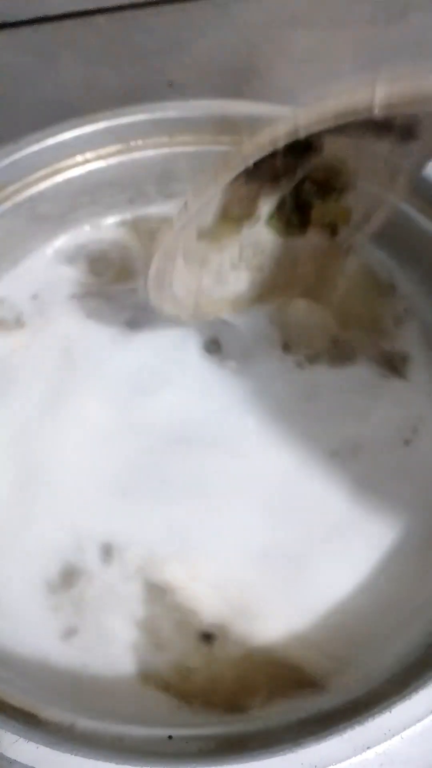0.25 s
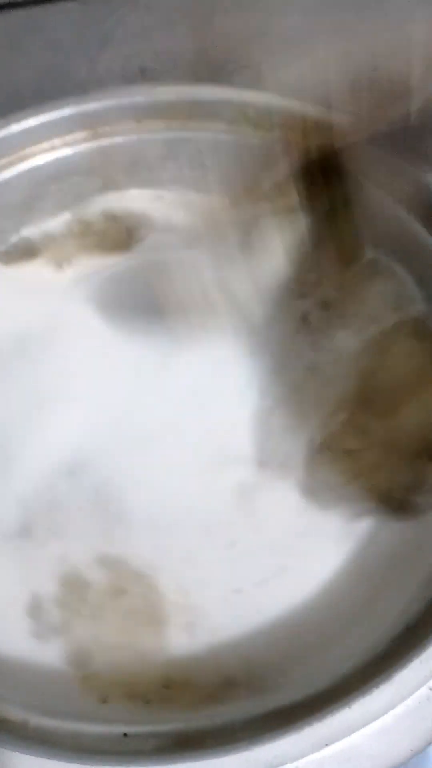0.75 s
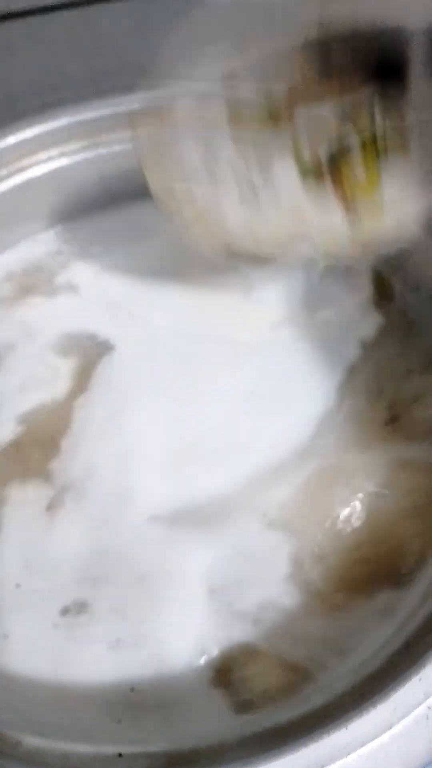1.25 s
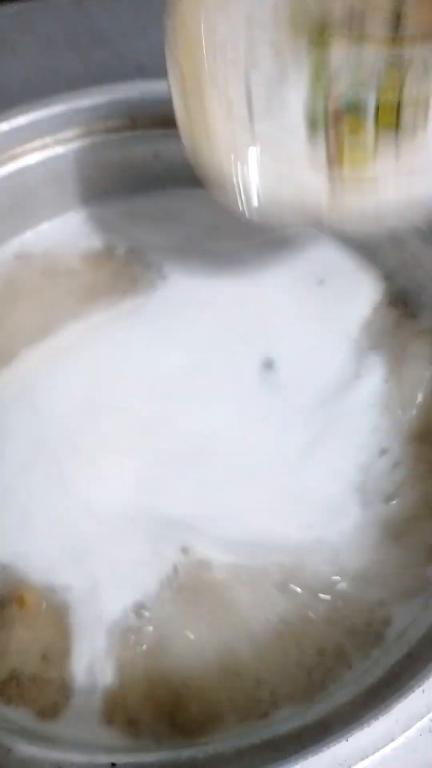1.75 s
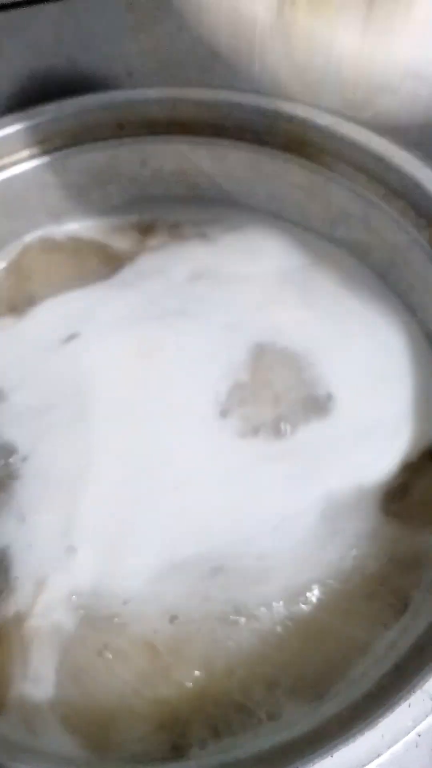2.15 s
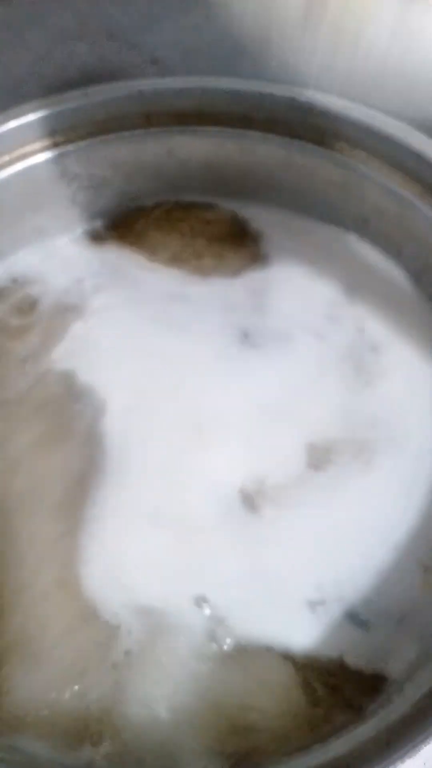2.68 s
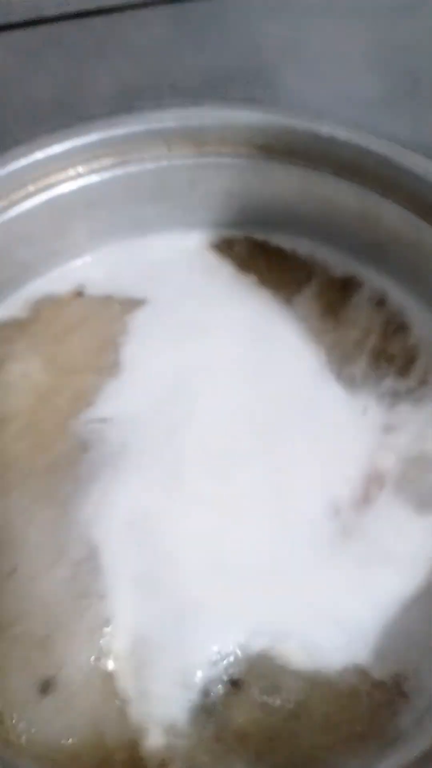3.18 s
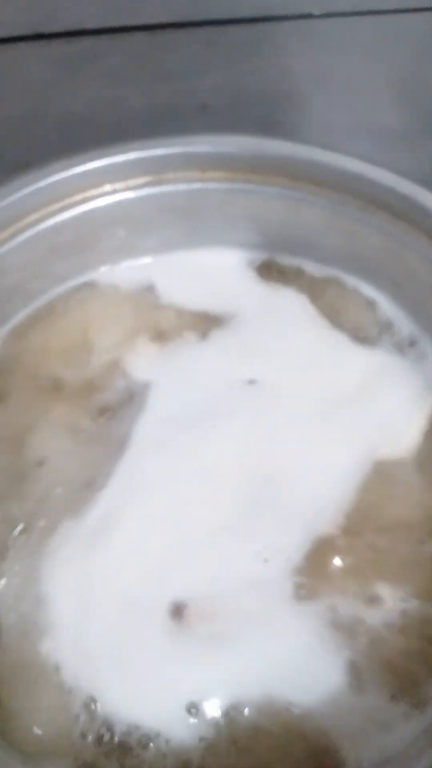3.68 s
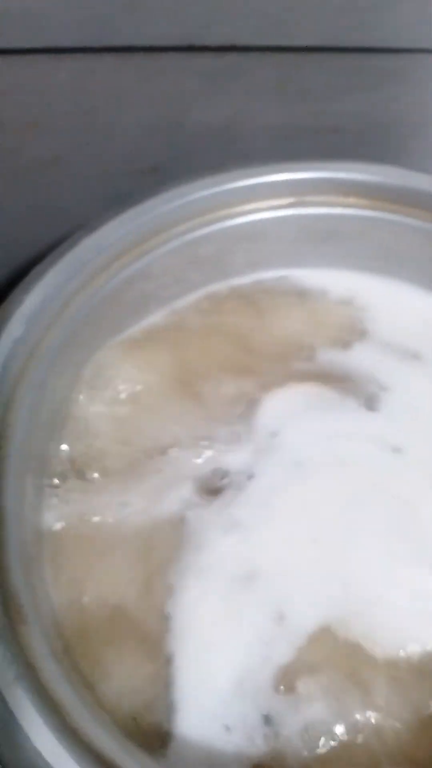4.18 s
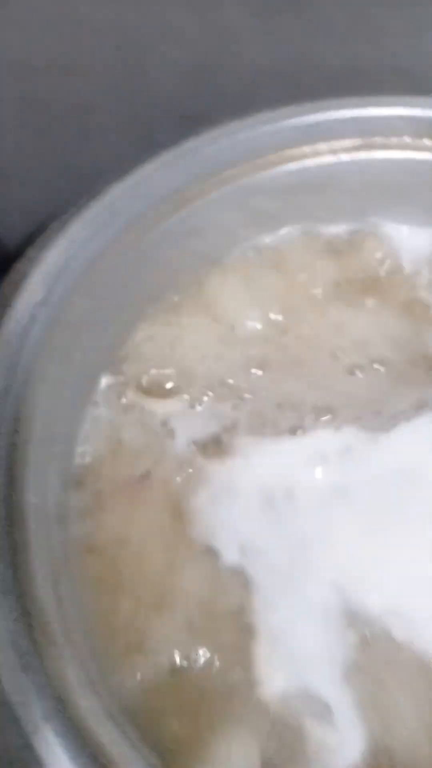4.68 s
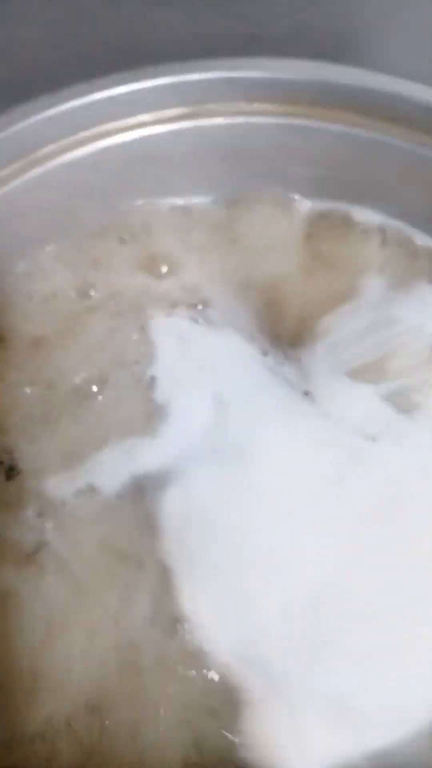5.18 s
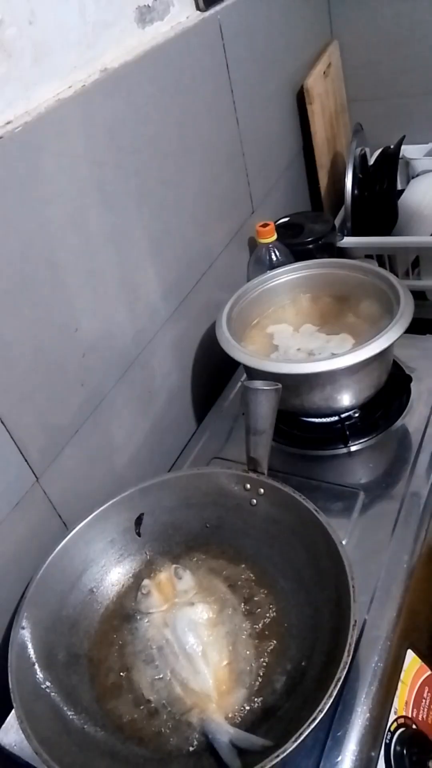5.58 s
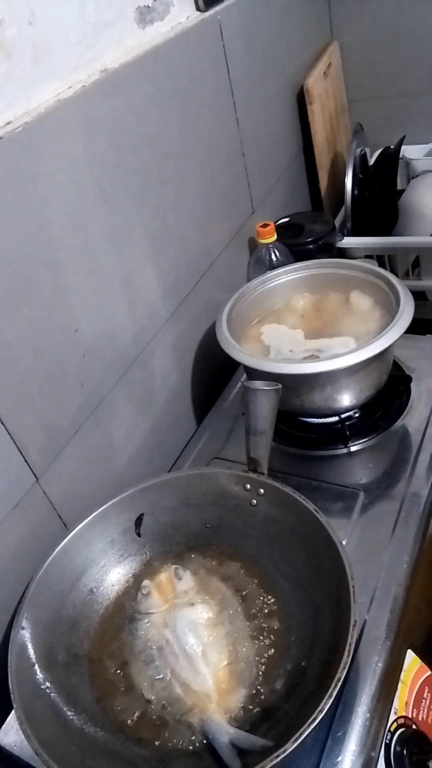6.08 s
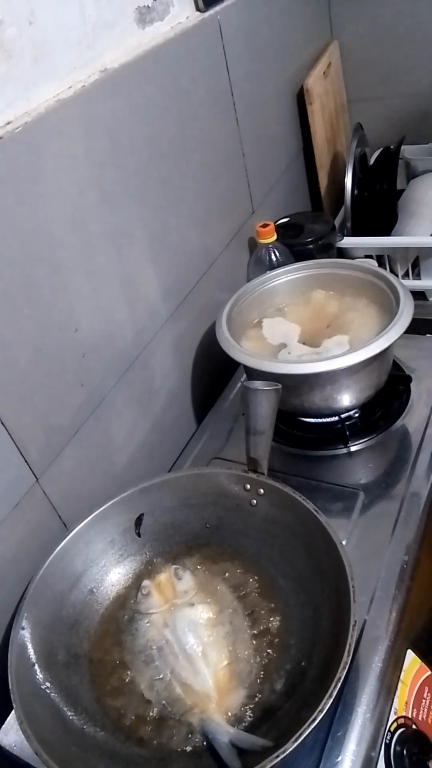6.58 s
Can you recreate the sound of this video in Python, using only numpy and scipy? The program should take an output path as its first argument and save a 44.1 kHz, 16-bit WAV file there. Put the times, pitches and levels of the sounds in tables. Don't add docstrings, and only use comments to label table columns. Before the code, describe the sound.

In a small tiled kitchen, close to a phone microphone, a gas flame rumbles low and hisses under faintly bubbling soup. Sparse sharp ticks of spitting fat and dull bowl bumps come and go. The bowl is set down with a ringing clink and softer bounce. A finger tap, a tiny dead silence, then dense sizzling of fish in oil with big wet pops.

```python
import sys
import numpy as np
from scipy import signal
from scipy.fft import rfft, irfft, next_fast_len
from scipy.io import wavfile
from scipy.ndimage import uniform_filter1d, map_coordinates

SR = 44100
rng = np.random.default_rng(int(sys.argv[2]) if len(sys.argv) > 2 else 0)


def unload_wav(signal):
    wavfile.write(
        sys.argv[1],
        SR,
        np.round(np.clip(np.atleast_2d(signal).T, -1, 1) * 32767).astype(np.int16),
    )


def makeup_ratio(level_db):
    decades = np.asarray(level_db, float) / 20
    return 10 ** decades


N = 301644

PAUSE = (5.4545, 5.5495)

# frequency in Hz, level in dB per Hz.
SIZZLE = [(180, -23), (330, -10.5), (630, -14.5), (1100, -11.5), (2000, -4), (3200, -0.5), (4300, -4.5),
          (5900, -14.5), (8200, -10.5), (9300, -25), (11000, -29), (13000, -38.5), (15800, -27.5)]
# time in seconds, strength in dB.
BOIL = [(5.7, -32), (5.874, -30.5), (5.982, -34.5), (6.008, -27.5), (6.032, -32.5), (6.508, -33.5),
        (6.562, -31), (6.84, -33)]


def frying():
    start, end = 5.5, 6.83
    wet = np.zeros(N)
    for _ in range(4):
        fizz = bubbles(2000, start, end, SIZZLE, cycles=3.5, scatter_db=2.8)
        wet += fizz + makeup_ratio(-2.5) * signal.fftconvolve(fizz, tail(stretch=0.35))[:N]
    crackle = bubbles(700, start, end, SIZZLE, cycles=1.6, scatter_db=2.8)
    bed = rush(lambda hz: makeup_ratio(along(SIZZLE, hz)), patchy_db=1.74) * makeup_ratio(2.0 * wobble(30))
    clumps = makeup_ratio(3.5 * wobble(90))
    boiling = makeup_ratio(-12.0) * wet * clumps + makeup_ratio(-15.5) * crackle + makeup_ratio(-3.0) * bed
    level_db = opening() + curve(BOIL)
    return (np.arange(N) / SR > PAUSE[0]) * makeup_ratio(level_db) * boiling


# start in seconds, strength in dB, pitch in Hz.
POPS = [(5.554, -34, 4200), (5.597, -22, 2720), (5.626, -38, 2750), (5.648, -21, 2630), (5.722, -20, 3200),
        (5.758, -17.5, 2530), (5.816, -19, 2880), (5.932, -18, 2650), (5.986, -24, 3520),
        (6.004, -12, 2700), (6.046, -15.5, 3370), (6.07, -20, 2370), (6.087, -15, 2800), (6.116, -25, 4000),
        (6.157, -29, 3340), (6.173, -18, 4040), (6.23, -13.5, 2910), (6.246, -22, 2220), (6.285, -17, 2820),
        (6.368, -21, 3070), (6.405, -18.5, 4250), (6.46, -21, 2570), (6.489, -23, 3580),
        (6.5527, -12, 1527), (6.594, -13.5, 4120), (6.612, -23, 3630), (6.659, -16, 2340),
        (6.701, -17, 2740), (6.744, -32, 2590), (6.803, -23, 2770)]


def big_bubbles():
    track = np.zeros(N)
    for s, db, hz in POPS:
        room_db = -2.5 - 0.46 * (db + 16)
        add_burst(track, s, db - 5, hz, cycles=4.8, snap_db=-24, room_db=room_db,
                  thud_db=-28, snap_t60=.012, stretch=.45)
    return track


# start in seconds, strength in dB, pitch in Hz, snap in dB, room in dB.
SPITS = [(0.188, -41, 2370, -10, -3), (0.2942, -33, 2230, -3, -12), (0.8106, -25.5, 5130, -3.5, -7.5),
         (0.911, -26.5, 3670, -6, -5), (1.3375, -43, 2330, -20, 0), (1.4119, -26.5, 5010, -10, -2),
         (1.436, -40, 2480, -20, -3), (1.5487, -19, 7800, -10.5, -11.5), (1.941, -45, 8200, -15, -1.5),
         (2.3605, -38, 4760, -14, -12), (2.392, -17.5, 2840, -12, -7), (2.555, -32.5, 7400, -12, -14),
         (2.613, -19, 4780, -9.5, -9), (2.827, -31, 5320, -4, -2.5), (3.1387, -16, 4730, -16, -6),
         (3.32, -39, 2420, -11, -4), (3.571, -36, 3270, -8, -6.5), (3.6095, -41.5, 8500, 1, -8),
         (3.8346, -27, 6240, -5, -8), (3.889, -38, 8300, -10, -2.5), (3.919, -18.5, 4000, -10.5, -6.5),
         (4.4241, -25.5, 2670, -7, -7), (4.44, -31, 6940, -2, -9)]


def spitting_fat():
    life_s = .0007
    track = np.zeros(N)
    for s, db, hz, snap_db, room_db in SPITS:
        add_burst(track, s, db - 5, hz, life_s * hz, snap_db - 2, room_db + 11,
                  thud_db=-40, snap_t60=.006, stretch=.9)
    return track


# frequency in Hz, level in dB, t60 in seconds.
BOWL = [(585, -19, 0.42), (1082, -20, 0.35), (1755, -18, 0.66), (2552, -2.5, 0.32), (2729, -13, 0.25),
        (2853, -25, 0.36), (3095, -14, 0.4), (3250, -14, 0.21), (3445, -3, 0.24), (3919, -21, 0.22),
        (4452, -13, 0.26), (5173, -25, 0.27), (5373, -17, 0.17), (6471, -23, 0.21), (6740, -26, 0.22),
        (6934, -30, 0.23), (7036, -29, 0.22), (7709, -29, 0.22), (7930, -35, 0.28), (8166, -23, 0.18)]
# start in seconds, level in dB, favoured pitch in Hz, spread in octaves,
# share of the ring time the hand leaves.
CLINKS = [
    (4.6078, -4, 3300, 1.8, .4),
    (4.6612, -0.5, 2550, .28, 0.29),
]
# frequency in Hz, level in dB per Hz.
CRASH = [(30, -37.5), (60, -3.5), (150, -4.5), (400, -8.5), (900, -5.5), (1800, -7), (3100, 4.5),
         (4000, -7), (8000, -12.5), (11000, -36.5), (16000, -32)]
# start in seconds, level in dB, t60 in seconds.
RIM = [
    (2.4235, -39.5, 0.23),
    (3.1, -53, .05),
    (.5515, -62, .05),
]


def bowl():
    track, t = np.zeros(N), np.arange(SR // 2) / SR
    for s, db, t60 in RIM:
        add(track, s, makeup_ratio(db) * puff(CRASH, t60))
    hz, level, t60 = np.transpose(BOWL)[:, :, None]
    for s, db, favoured_hz, spread, damping in CLINKS:
        chance = rng.random((len(BOWL), 3))
        held = makeup_ratio(-9 * abs(np.log2(hz / favoured_hz)) / spread - 60 * t / (damping * t60))
        beating = np.cos(2 * np.pi * ((9 + 14 * chance[:, 1:2]) * t + chance[:, 2:]))
        free_db = -20 - 0.2 * np.maximum(level, -22)
        free = makeup_ratio(free_db - 60 * t / np.clip(t60, .24, .3)) * beating
        tones = np.sin(2 * np.pi * (hz * t + chance[:, :1]))
        rise_s = .005 / np.sqrt(spread)
        ring = (makeup_ratio(level) * (held + free) * tones).sum(axis=0) * (1 - np.exp(-t / rise_s)) ** 2.2
        echo = signal.fftconvolve(ring, tail(stretch=.9))[:len(t)]
        add(track, s, makeup_ratio(db) * (ring + makeup_ratio(-17) * echo))
    add(track, CLINKS[0][0], makeup_ratio(-16.5) * puff(CRASH, t60=0.1) + makeup_ratio(-20.5) * puff(CRASH, t60=.26))
    add(track, CLINKS[1][0], makeup_ratio(-29.5) * puff(CRASH, t60=0.14))
    return track


# start in seconds, peak in dB, pitch in Hz, cycles, thud in
# dB.
KNOCKS = [(.530, -37.5, 2280, 1.9, -10), (2.424, -23.5, 1840, 3.8, -6), (3.488, -46.5, 304, 4.2, 6),
          (4.244, -48, 12000, 1.5, -28.5), (2.4245, -30.5, 8050, 1.8, -30),
          (4.366, -29.5, 1990, 0.88, -9.5), (5.845, -35, 820, 3, -15), (5.882, -38, 920, 3, -14),
          (5.999, -43, 315, 4, 3), (6.31, -32.5, 403, 0.85, -1.5), (6.625, -31, 880, 2.6, 0),
          (6.683, -31, 1540, 4.3, -5), (6.696, -38.5, 298, 2.4, 2)]


def knocks():
    track = np.zeros(N)
    for s, db, hz, cycles, thud_db in KNOCKS:
        snap_db = -20.5 + 1.5 * np.log2(hz / 1000)
        add_burst(track, s, db, hz, cycles, snap_db, room_db=3, thud_db=thud_db, snap_t60=.04, stretch=.75)
    return track


# start in seconds, peak in dB, pitch in Hz, cycles, thud in dB.
TAPS = [
    (.552, -29.5, 190, 0.82, -11),
    (2.4222, -37.5, 128, 2.3, -22),
    (.5505, -29, 800, 1.8, -3.5),
    (0.5539, -22.5, 513, 0.79, -7.5),
    (5.4424, -26, 1430, 0.8, -18),
    (5.4436, -38, 107, 1.4, -24),
    (5.4482, -21.5, 1460, 1.55, -2),
]


def taps():
    track = np.zeros(N)
    for s, db, hz, cycles, thud_db in TAPS:
        add_burst(track, s, db, hz, cycles, snap_db=-25.5, room_db=-5, thud_db=thud_db, snap_t60=.012, stretch=.6)
    return track


# time in seconds, level in dB.
FLAME = [(0.0, -51.5), (0.47, -53.5), (0.59, -53.5), (1.6, -55.5), (2.01, -53.5), (2.22, -56), (2.93, -53),
         (4.04, -54.5), (4.2, -54), (5.19, -53.5), (5.31, -55), (5.43, -56)]
# frequency in Hz, level in dB per Hz.
HISS = [(180, -3.5), (300, -8.5), (600, -7.5), (800, -9), (1750, -9), (2600, -12.5), (5000, -24),
        (6800, -24), (8100, -20), (9200, -30.5), (11300, -38), (13300, -41.5), (15800, -33.5)]


def stove():
    later = np.arange(N) / SR > PAUSE[0]
    wok_db = -53.5 + 2.3 * opening()
    pot_db = -0.5 + curve(FLAME)
    rumble_db = np.where(later, wok_db, pot_db) - 0.7 * wobble(4.5)
    rumble = makeup_ratio(rumble_db + 3.5 + 0.35 * wobble(6.6)) * rush(hollow, patchy_db=1.3)
    hiss = makeup_ratio(-53 + 0.14 * wobble(4.9)) * rush(lambda hz: makeup_ratio(along(HISS, hz)), patchy_db=1.03)
    soup = bubbles(900, start=0, end=3.9, spectrum=HISS, cycles=3.6, scatter_db=-0.5)
    soup_echo = signal.fftconvolve(soup, tail(stretch=.8))[:N]
    return rumble + hiss + makeup_ratio(-72) * (soup + 2 * soup_echo)


# frequency in Hz, level in dB per Hz.
RUMBLE = [(12, -47.5), (25, -8), (40, -15), (50, -14.5), (65, -4), (108, -13), (150, -12), (200, -20.5),
          (450, -31.5), (650, -63.5), (1100, -120)]
# frequency in Hz, width in Hz, level in dB.
POT = [(110.7, 15, 8.5), (280.4, 33, -0.5), (353, 7.5, 3), (453, 17, -1), (617.5, 12, 0.5),
       (1060, 68, -7.5), (1780, 100, -9.5)]


def hollow(hz):
    tones = sum(makeup_ratio(db) ** 2 / (1 + (2 * (hz - c) / w) ** 2) for c, w, db in POT)
    return np.sqrt(makeup_ratio(along(RUMBLE, hz)) ** 2 + makeup_ratio(-8.0) ** 2 * tones * (hz > 20))


def bubbles(count, start, end, spectrum, cycles, scatter_db):
    draw = rng.random((count, 4))
    hz = 500 * 15 ** draw[:, 1:2]
    strength_db = -scatter_db * np.log(draw[:, 2:3] + 1 / 60)
    size = makeup_ratio(along(spectrum, hz) + 20 * np.log10(hz) + strength_db)
    n = np.arange(384)
    turns = hz * n / SR
    life = cycles * (0.74 + 1.36 * draw[:, 3:])
    rising = np.sin(2 * np.pi * turns * (1 + .08 * turns / life))
    grain = size * rising * (turns / life) * np.exp(-2.5 * turns / life)
    where = ((start + (end - start) * draw[:, :1]) * SR).astype(int) + n
    track = np.bincount(where.ravel(), grain.ravel(), N + len(n))[:N]
    return track / np.sqrt(np.sum(track ** 2) / ((end - start) * SR))


# frequency in Hz, level in dB.
SNAP = [(300, -38), (2000, 0), (5000, -1.5), (8000, -3), (9500, -15.5), (11500, -36), (16000, -17)]
# frequency in Hz, level in dB.
THUD = [(40, -30.5), (110, 2), (300, -13), (800, 2), (1400, -13), (3000, -20.5), (8000, -31.5),
        (16000, -75)]


def add_burst(track, s, db, hz, cycles, snap_db, room_db, thud_db, snap_t60, stretch):
    t = np.arange(SR // 2) / SR
    life = max(cycles, .5) / hz
    rising = np.sin(2 * np.pi * hz * t * (.92 + .07 * np.minimum(t / life, 4)))
    tone = 6 * rising * (t / life) * np.exp(-2.5 * t / life)
    snap = makeup_ratio(snap_db) * puff(SNAP, snap_t60)
    thud = makeup_ratio(thud_db) * puff(THUD, t60=0.015) * np.tanh(t / 0.00053)
    direct = tone + snap + thud
    echo = np.roll(signal.fftconvolve(direct, tail(stretch))[:len(t)], 66)
    add(track, s + .0004, makeup_ratio(db) * (direct + makeup_ratio(room_db) * echo))


def puff(colour, t60):
    t = np.arange(SR // 2) / SR
    noise = filtered(rng.standard_normal(len(t)), lambda hz: makeup_ratio(along(colour, hz)))
    return unit(noise) * makeup_ratio(-60 * t / t60)


def rush(gain, patchy_db):
    z = signal.stft(rng.standard_normal(N), nperseg=512)[2]
    patches = unit(smooth_field(z.shape, bands=6, frames=8))
    noise = signal.istft(z * makeup_ratio(patchy_db * patches), nperseg=512)[1][:N]
    return unit(filtered(noise, gain))


# frequency in Hz, t60 in seconds.
KITCHEN = [(200, 0.29), (2000, 0.21), (5000, 0.19), (10000, 0.1)]


def tail(stretch):
    hz, t, z = signal.stft(rng.standard_normal(SR // 3), SR, nperseg=256)
    t60 = stretch * along(KITCHEN, hz)[:, None]
    answer = signal.istft(z * makeup_ratio(-60 * t / t60), SR, nperseg=256)[1]
    return answer / np.linalg.norm(answer)


def opening():
    since = np.maximum(np.arange(N) / SR - PAUSE[1], 0)
    return -11 * np.exp(-since / 0.079)


# frequency in Hz, share of time left empty.
DROPOUTS = [(9500, .002), (11500, .09), (13300, .26), (14500, .13), (15700, .06)]


def patchy_treble(x):
    hz, t, z = signal.stft(x, SR, nperseg=2048)
    field = smooth_field(z.shape, bands=12, frames=2)
    rank = field.ravel().argsort().argsort().reshape(z.shape) / z.size
    busy = 1 + 0.31 * (t > PAUSE[0])
    empty_share = along(DROPOUTS, hz)[:, None] * busy * (hz > 9000)[:, None]
    return signal.istft(z * (rank > empty_share), SR, nperseg=2048)[1][:N]


def smooth_field(shape, bands, frames):
    field = uniform_filter1d(rng.standard_normal(shape), size=bands, axis=0)
    return uniform_filter1d(field, size=frames, axis=1)


def unit(x):
    return x / np.sqrt(np.mean(x ** 2) + 1e-20)


def along(points, hz):
    f, v = np.transpose(points)
    return np.interp(np.log(hz + 1), np.log(f + 1), v)


def curve(rows):
    return np.interp(np.arange(N) / SR, *np.transpose(rows))


def wobble(rate):
    knots = rng.standard_normal(int(N * rate / SR) + 4)
    return map_coordinates(knots, [np.arange(N) * rate / SR])


def filtered(x, response):
    m = next_fast_len(len(x) + 8192)
    return irfft(rfft(x, m) * response(np.fft.rfftfreq(m, 1 / SR)), m)[:len(x)]


def add(track, s, sound):
    part = track[round(s * SR):][:len(sound)]
    part += sound[:len(part)]


def scene():
    background = stove()
    bursts = spitting_fat() + knocks() + taps() + big_bubbles()
    return (background + bursts + bowl() + frying())[None]


def band_limit(x):
    return signal.sosfilt(signal.butter(12, 16550, fs=SR, output="sos"), x)


def record(dry):
    t = np.arange(N) / SR
    offset = 0.0068 + 0.00086 * wobble(5)
    settling = 1 - 0.77 * (t > PAUSE[1]) * np.exp(-abs(t - PAUSE[1]) / 0.24)
    running = (t < PAUSE[0]) | (t > PAUSE[1])
    picked_up = (patchy_treble(dry[0]) + offset * settling) * running
    heard = filtered(picked_up, lambda hz: hz < 15760)
    return band_limit(heard[None])


dry = scene()
out = record(dry)
unload_wav(out)
```